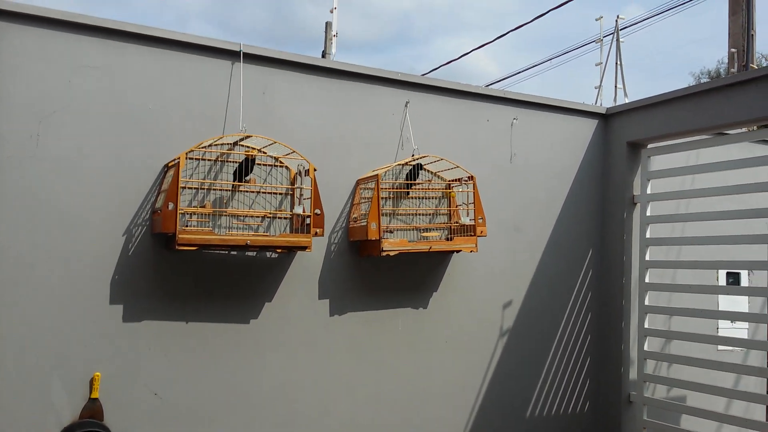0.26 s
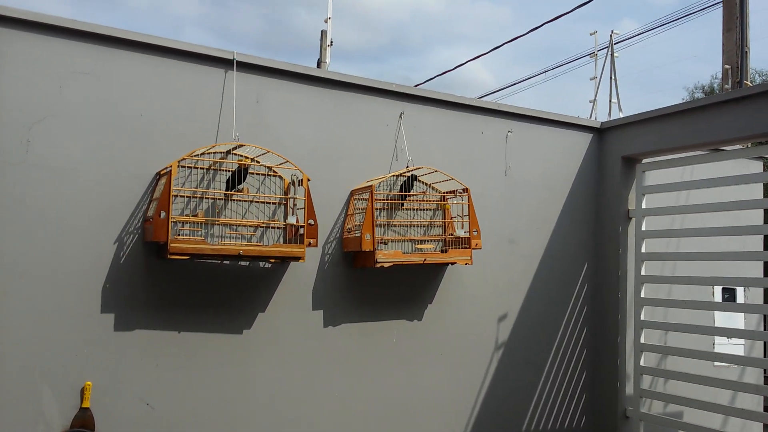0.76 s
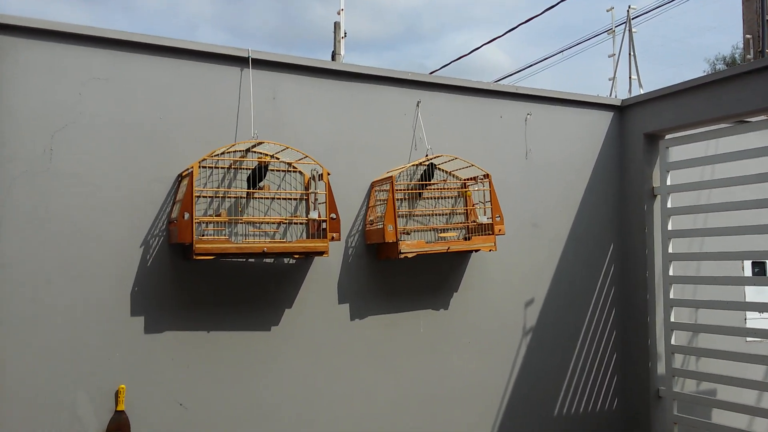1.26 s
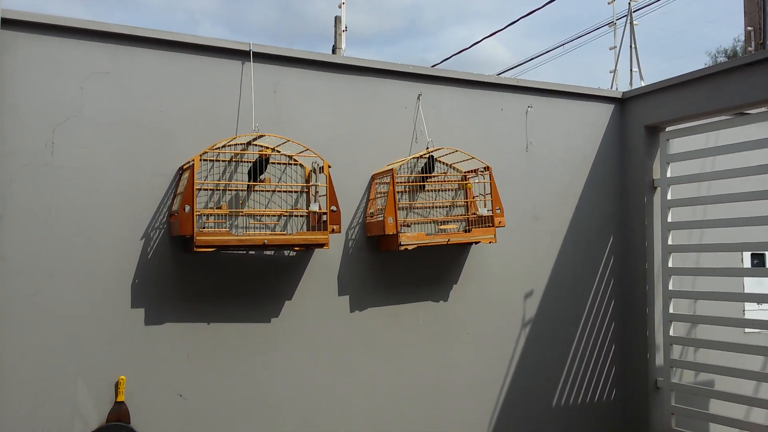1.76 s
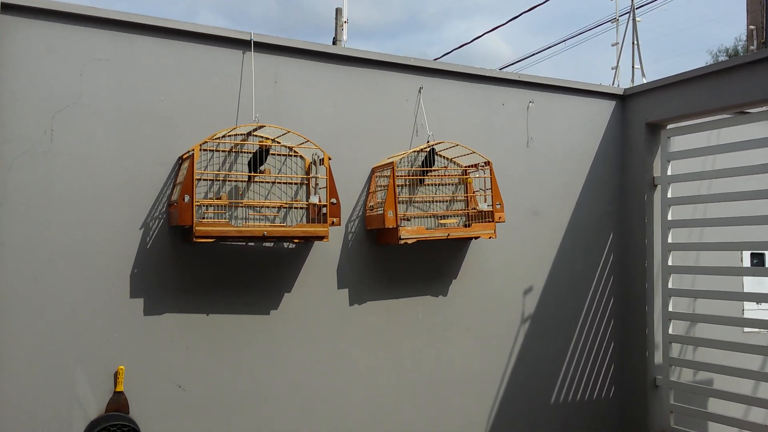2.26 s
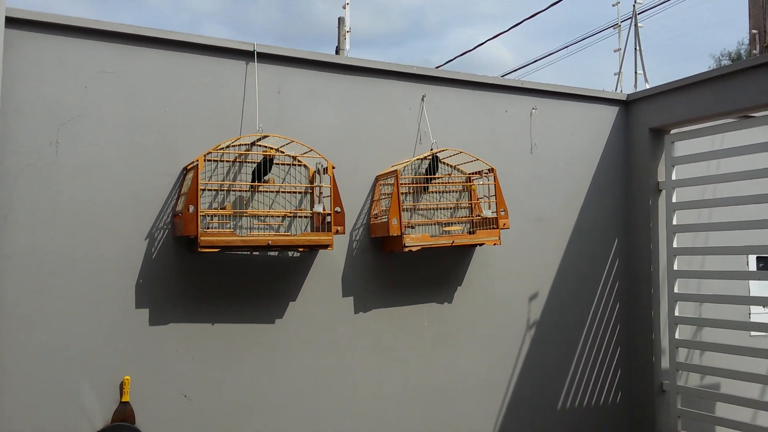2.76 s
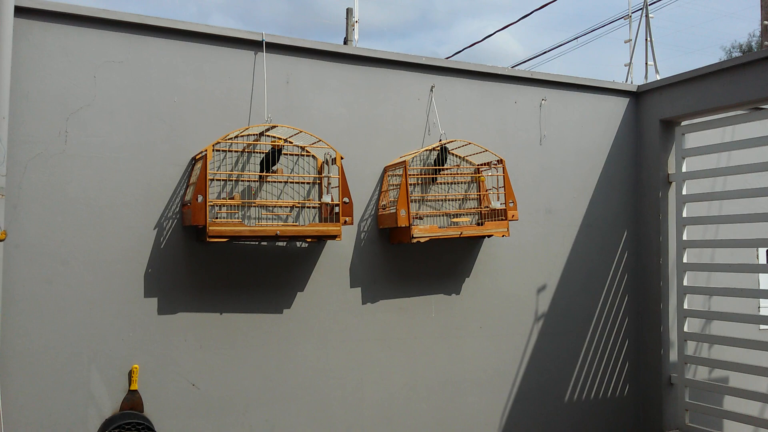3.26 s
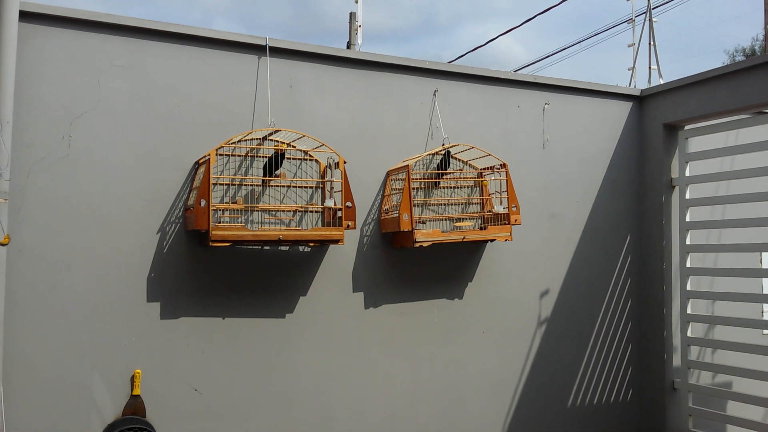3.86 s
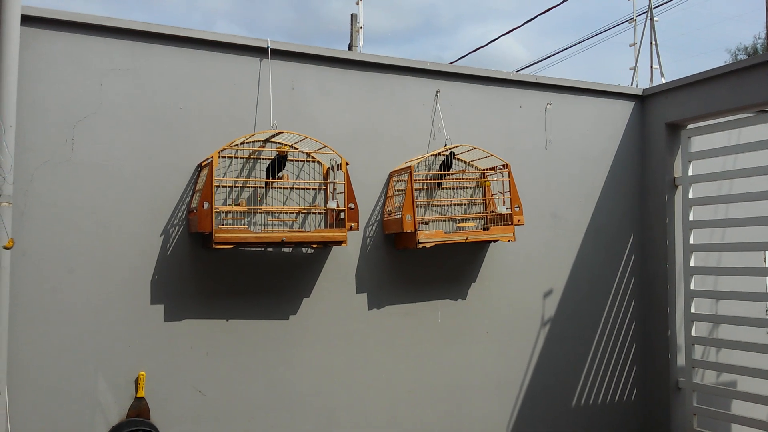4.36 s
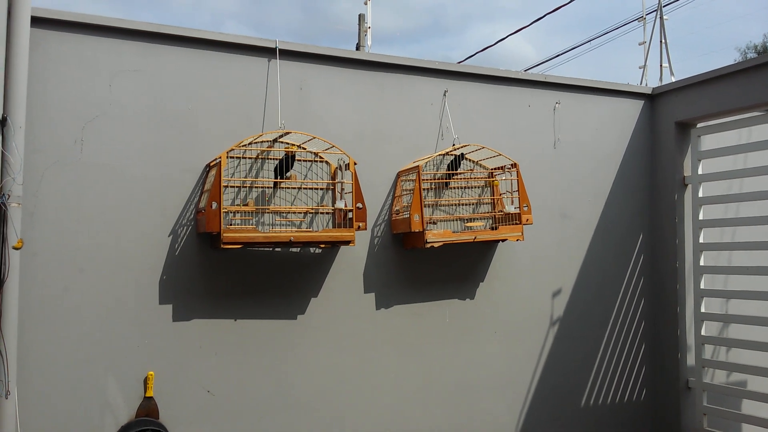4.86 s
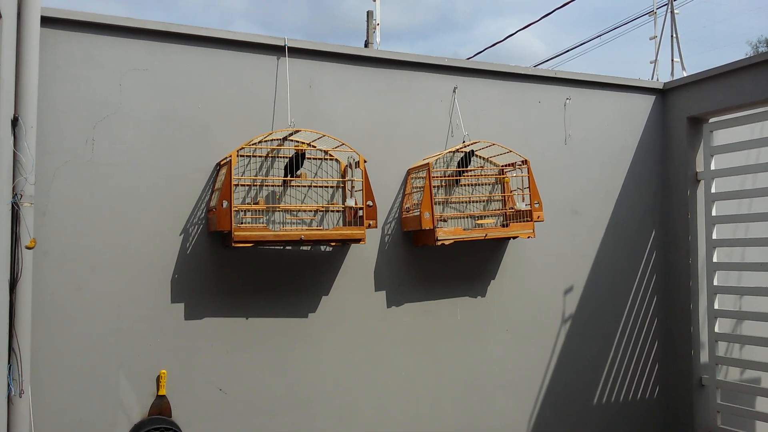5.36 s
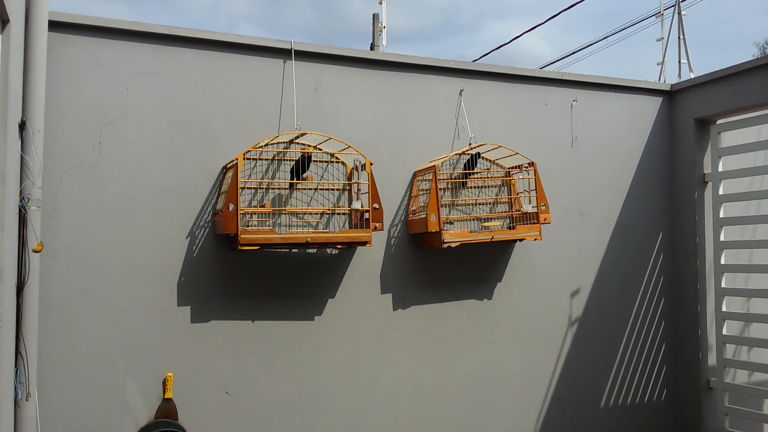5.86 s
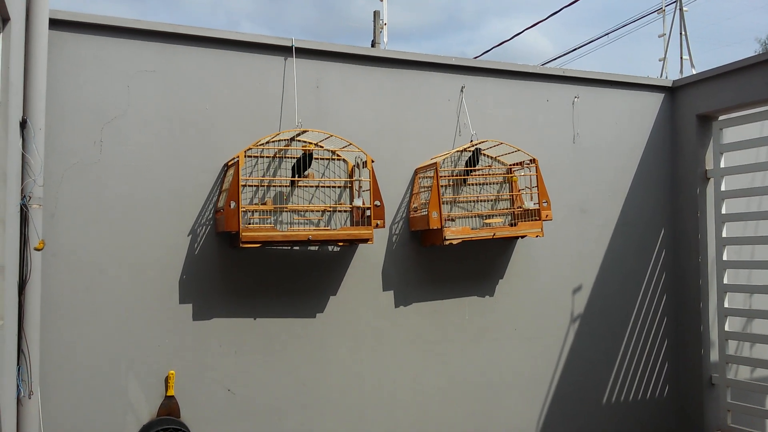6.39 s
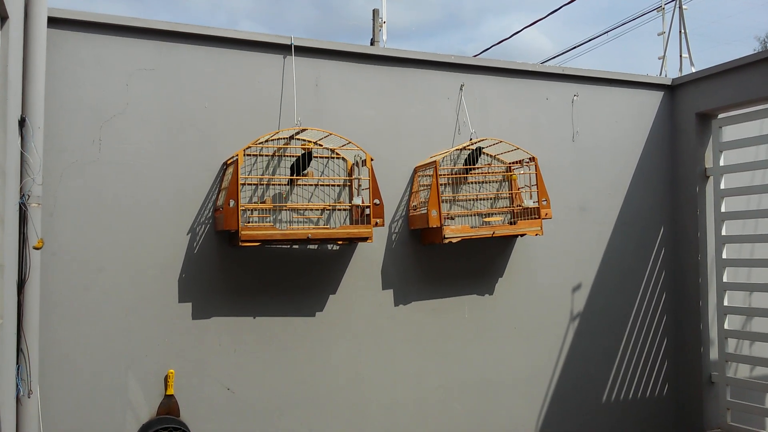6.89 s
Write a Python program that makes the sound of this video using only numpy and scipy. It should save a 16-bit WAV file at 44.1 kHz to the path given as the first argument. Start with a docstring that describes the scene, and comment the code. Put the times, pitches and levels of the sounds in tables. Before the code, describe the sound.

Loud, clear whistles from two caged birds slide up and down with short gaps between them, ringing briefly off the walls of an open yard. Runs of grainy chirps come at the start and the end, with scratchy rasps and quiet reedy notes in between. The birds sound near and direct. A soft thud with a low hum passes early, and a very faint two-note call comes from far off late, over light outdoor rumble and hiss.

```python
"""Caged blackbirds in a courtyard

Two birds sing on the wall of a bare, hard-walled yard. The syrinx membrane gives loud slurred
whistles, soft low notes, held tones and bubbling chirps; vibrating chaotically, it gives short rasps.
The walls smear each glide into a tail. Behind: one far-off call, a dull bump, a low hum, faint rumble."""
import sys
import numpy as np
from scipy import signal
from scipy.fft import rfft, irfft, next_fast_len
from scipy.io import wavfile
from scipy.ndimage import uniform_filter1d, minimum_filter1d

SR = 44100
rng = np.random.default_rng(int(sys.argv[2]) if len(sys.argv) > 2 else 0)


def to_wav(s):
    """Save 16-bit WAV."""
    ch = np.atleast_2d(s).T  # columns
    pcm = np.round(np.clip(ch, -1, 1) * 32767)  # PCM
    wavfile.write(sys.argv[1], SR, pcm.astype(np.int16))


N = 314433
TIME = np.arange(N) / SR

# throat and beak response: f/Hz, gain/dB
BEAK_RESPONSE = [(2000, 4.5), (4500, 0), (5700, 3), (7000, -11), (8800, -6), (10000, -14.5), (11500, -8.5),
                 (13000, 0), (15500, -12.5)]


def whistles(gain_db=-3):
    """Loud slurred notes; two or three tones sound at once where they overlap."""
    # t/s, glide/s, drop/s, f_from/Hz, f_to/Hz, scoop/oct, drop/oct, level/dB, attack/s, fade/dB,
    # pan L-R/dB, octave gain/dB, upper overtone gain/dB, hoarseness/0-1
    notes = [ (0.453, 0.029, 0.0185, 5490, 5466, 0.12, 0.068, -25, 0.0039, 4.5, 6.5, -22, -8, 0.36),
             (0.457, 0.025, 0.049, 3630, 3640, .15, 0.88, -10, 0.0057, -8.5, -3, 0.5, 10.5, 0),
             (.673, 0.072, 0.038, 4056, 4617, -0.06, .33, -1, 0.0033, 10, 2, -7.5, 0.5, 0),
             (1.276, 0.012, 0.005, 5730, 4620, 0.16, 0.06, -16, 0.0077, 6, 5.5, 19, 10, 0.77),
             (1.292, 0.015, 0.052, 3154, 3180, -0.045, 0.65, -9, 0.015, 4, -3, -4.5, 6, 0),
             (1.713, 0.068, 0.046, 2093, 2920, -0.15, 0.025, -17, 0.024, 1, -3, -.5, 7.5, 0.1),
             (2.236, 0.051, 0.14, 2696, 2662, 0.045, .18, -7, 0.06, 3, -4.5, -5.5, 1.5, 0.15),
             (2.693, 0.024, 0.036, 2980, 3163, -.02, 0.52, -9, 0.0093, 1.5, 1.5, -2, 5, 0.28),
             (3.053, 0.021, 0.009, 4450, 4900, -0.18, -0.25, -24.5, 0.00194, 19, 6, -21, -8, .18),
             (3.059, 0.028, 0.0074, 3293, 3630, 0.097, -0.089, -22, 0.0038, 3, 4.5, 13, 7.5, .1),
             (3.076, .12, 0.03, 3630, 3949, 0.051, 0.013, -6, 0.012, -0.5, -0.5, -11, 2.5, 0),
             (3.558, 0.051, 0.12, 3556, 3562, 0.013, -0.11, -5.5, 0.013, 15.5, 0, -3, 4, 0),
             (4.84, .322, 0.044, 2903, 2076, -0.25, .66, -9, .018, 9.5, -3.5, -7, 0.5, 0.03),
             (5.349, 0.0147, 0.0084, 3300, 3417, -0.55, -.04, -16, 0.0096, 5.5, 1.5, 15, -20.5, 0.11),
             (5.349, .038, 0.045, 4780, 5022, -0.086, 1, -0.5, 0.05, 2, 2, -2, 6.5, 0.3),
             (5.79, 0.023, .036, 5910, 5795, -0.81, 1.08, -12, 0.0091, -2.5, 4.5, 5, -22, .02),
             (6.412, .1, .045, 3858, 3756, 0.0083, .15, -14.5, 0.016, -4, 4.5, 2.5, 4, 0),
             (6.416, 0.036, 0.13, 4060, 4104, 0.13, 0.69, -23.5, .02, -1.5, 5, -15, 8, 0.1),
             (6.422, .06, .09, 3480, 3737, -0.03, .24, -10, 0.035, 1, 1.5, 5, 15.5, 0.04),
             (6.787, 0.017, 0.02, 2048, 2078, -0.15, 0.57, -19, 0.0051, 13, -6.5, 21.5, 12, 0.12), ]
    out = np.zeros((2, N))
    for start_s, *shape, pan_db, octave_db, upper_db, hoarse in notes:
        tone = voice(slur(start_s, *shape), octave_db, upper_db, hoarse)
        add(out, start_s, from_db(gain_db) * tone, pan_db)
    return out


def held_tones(gain_db=-3, fade_db=4):
    """Tones under the trills, without scoop or drop."""
    # t/s, length/s, f_from/Hz, f_to/Hz, level/dB, attack/s, pan L-R/dB, octave gain/dB,
    # upper overtone gain/dB, hoarseness/0-1
    notes = [(0, 0.23, 1850, 1851, -29.5, 0.00097, 8, 23.5, 18.5, 0.39),
             (6.858, .27, 2000, 1882, -14, .028, -15.5, -17, -13, 0.15)]
    out = np.zeros((2, N))
    for start_s, length_s, from_hz, to_hz, db, attack_s, pan_db, *timbre in notes:
        contour = slur(start_s, length_s, 0, from_hz, to_hz, 0, 0, db + gain_db, attack_s, fade_db)
        add(out, start_s, voice(contour, *timbre), pan_db)
    return out


def low_notes(gain_db=-3, drop_s=0.022, drop_oct=0.3):
    """Quiet reedy notes that hang briefly, then drop."""
    # t/s, glide/s, f_from/Hz, f_to/Hz, scoop/oct, level/dB, pan L-R/dB, overtone gain/dB
    notes = [(.005, 0.08, 1660, 1348, 0.0071, -24, -4, 14), (1.529, 0.014, 1414, 1373, -0.18, -34, -10, 3),
             (2.021, 0.016, 1320, 1211, 0.028, -28, -3, 12),
             (4.51, 0.084, 1521, 1522, -.4, -25.5, -4.5, -1.5),
             (5.63, .057, 1513, 1436, -0.043, -28.5, -2, 9), (6.565, .032, 1450, 1308, 0, -39.5, -9, 10)]
    out = np.zeros((2, N))
    for start_s, glide_s, from_hz, to_hz, scoop_oct, db, pan_db, bright_db in notes:
        contour = slur(start_s, glide_s, drop_s, from_hz, to_hz, scoop_oct, drop_oct, db + gain_db,
                       attack_s=0.01, fade_db=3)
        tone = voice(contour, octave_db=bright_db + 2, upper_db=bright_db - 2, hoarse=0.085)
        add(out, start_s, tone, pan_db)
    return out


def slur(start_s, glide_s, drop_s, from_hz, to_hz, scoop_oct, drop_oct, db, attack_s, fade_db):
    """Note contour that scoops onto pitch, glides and drops. Rows: t/s, f/Hz, level/dB."""
    onset_db, loss_db_per_oct = 19, 13
    scoop_s = min(0.0065, 0.2 * glide_s)
    along = np.linspace(0, 1, num=200)
    t = along * (glide_s + max(drop_s, 0))
    drop_ramp = np.maximum(t - glide_s, 0) / max(drop_s, 1e-6)
    dropped_oct = drop_oct * uniform_filter1d(drop_ramp, size=21, mode="nearest")
    bend_oct = scoop_oct * np.exp(-t / scoop_s) - dropped_oct
    hz = np.interp(t, [0, glide_s], [from_hz, to_hz]) * 2 ** bend_oct
    attack_left = np.maximum(1 - t / max(attack_s, 1e-6), 0)
    level_db = db - onset_db * attack_left - fade_db * along - loss_db_per_oct * dropped_oct
    return np.transpose([start_s + t, hz, level_db])


def voice(contour, octave_db, upper_db, hoarse, grain_hz=600):
    """Nearly pure tone; hoarseness roughens the overtones and adds period doubling."""
    # harmonics 2-6: level/dB
    harmonics_db = [-17.5, -27, -36, -33.5, -36]
    phase, pitch_hz, level = syrinx(contour)
    t = TIME[:len(phase)]
    # the membrane slackens as pitch falls: less steady, and duller in a quick fall
    fallen_oct = np.log2(np.maximum.accumulate(pitch_hz) / pitch_hz)
    phase = phase + 0.15 * fallen_oct * waver(t, grain_hz)
    slack_gain = from_db(-fallen_oct / t[-1])
    overtones = 0
    for k, db in enumerate(harmonics_db, 2):
        grain_rad = (0.45 + hoarse) * waver(t, grain_hz) / np.sqrt(k)
        gain = from_db(db + (octave_db if k == 2 else upper_db))
        overtones += gain * partial(phase + grain_rad, pitch_hz, k)
    effort = rms_one(uniform_filter1d(level, size=600, mode="nearest"))
    tone = np.sin(phase) + slack_gain * effort ** 0.25 * overtones
    doubling = 1 + 0.065 * hoarse * np.cos(phase / 2)
    return level * tone * doubling


def syrinx(contour, jitter=0.0035, shimmer_db=2.36, edge_s=0.0022, jitter_rate_hz=350):
    """Membrane following a contour, slightly unsteady. Returns phase/rad, f/Hz, amplitude."""
    times_s, hz, db = np.transpose(contour)
    t = np.arange(times_s[0], max(times_s[-1], times_s[0] + edge_s) + edge_s, 1 / SR)
    pitch_hz = uniform_filter1d(np.interp(t, times_s, hz), size=130, mode="nearest")
    pitch_hz *= 1 + jitter * waver(t, jitter_rate_hz)
    to_edge_s = np.minimum(t - t[0], t[-1] - t)
    fade = np.sin(np.pi / 2 * np.clip(to_edge_s / edge_s, 0, 1)) ** 2
    level = from_db(np.interp(t, times_s, db) + shimmer_db * waver(t, 150))
    return 2 * np.pi * np.cumsum(pitch_hz) / SR, pitch_hz, np.sqrt(2) * level * fade


def partial(phase, pitch_hz, multiple):
    """One harmonic as it leaves the beak."""
    hz = multiple * pitch_hz
    return from_db(at_hz(BEAK_RESPONSE, hz)) * (hz < SR / 2) * np.sin(multiple * phase)


def trills(period_s=0.06):
    """Even runs of chirps, sinking and growing rougher. Yields t/s, f/Hz, level/dB, relative jitter."""
    # t_first/s, t_last/s, f_first/Hz, f_last/Hz, level/dB, swell/dB, relative jitter of last chirp
    runs = [(.018, 0.354, 1911, 1691, -16, -1, 0.061), (6.866, 7.047, 1934, 1694, -17.5, 0.5, 0.042)]
    for first_s, last_s, first_hz, last_hz, db, swell_db, jitter in runs:
        span_s = last_s - first_s
        for along in np.linspace(0, 1, round(span_s / period_s) + 1):
            hz = first_hz * (last_hz / first_hz) ** along
            jitter_share = np.interp(along, [0, 1], [0.64, 1])
            yield first_s + along * span_s, hz, db + swell_db * along, jitter * jitter_share


def chirps(hold_s=0.01134, drop_s=0.00999, grain_rad=0.22, grain_hz=900, gain_db=-3):
    """Grainy notes that hang an instant, then drop; strongest on the second partial."""
    # partials 1-7: level/dB
    partials_db = [-11, 3.5, -12, -12, -24, -23.5, -30]
    out = np.zeros((2, N))
    for centre_s, hz, db, jitter in trills():
        start_s, knee_s = centre_s - hold_s / 2, centre_s + hold_s / 2
        contour = [(start_s, hz, db - 5), (knee_s, 0.95 * hz, db), (knee_s + drop_s, 0.74 * hz, db - 13)]
        phase, pitch_hz, level = syrinx(contour, jitter, shimmer_db=3, jitter_rate_hz=grain_hz)
        t = TIME[:len(phase)]
        tone = sum(from_db(part_db) * partial(phase + grain_rad * waver(t, grain_hz), pitch_hz, k)
                   for k, part_db in enumerate(partials_db, 1))
        add(out, start_s, from_db(gain_db) * level * tone, pan_db=-3)
    return out


def rasps(flutter_db=2, flutter_hz=300, rattle_db=5, rattle_hz=75):
    """Chaotic syrinx vibration: fluttering, rattling hiss through throat and beak resonances."""
    # t/s, length/s, f_centre/Hz, level/dB, pan L-R/dB, treble tilt/(dB/oct)
    bursts = [(0.094, 0.29, 3290, -20.5, 1, 1.5), (0.844, 0.026, 2370, -21.5, -5, 3.5),
              (0.972, 0.13, 3355, -20, -0.5, 5), (1.606, 0.1, 1812, -28.5, -4.5, 2.5),
              (2.812, 0.065, 2025, -18.5, -6.5, 2.5), (3.314, 0.059, 1940, -22, -4.5, 3),
              (3.784, 0.064, 2060, -22, -3.5, 6), (4.267, 1, 4600, -50, 4, 6.5),
              (6.54, 0.12, 2910, -20, -2, 5.5)]
    # f/f_centre, level/dB
    rasp_spectrum = [(.25, -50), (.42, -27.5), (.6, -13), (.74, -9), (.9, 1), (1.15, 1.5), (1.45, -16),
                     (2.4, -18.5), (3.4, -30.5), (6.5, -32)]
    # throat resonances: f/Hz, width/Hz, boost/dB
    resonances = [(942, 140, 9), (1230, 61, 12.5), (1893.6, 55, 7.5), (2490, 190, 9.5)]
    out = np.zeros((2, N))
    hz = np.geomspace(300, 16000, num=300)
    throat_db = sum(boost_db * np.exp(-((hz - peak_hz) / width_hz) ** 2)
                    for peak_hz, width_hz, boost_db in resonances)
    tract_db = throat_db + at_hz(BEAK_RESPONSE, hz)
    for start_s, length_s, centre_hz, db, pan_db, tilt in bursts:
        t = np.arange(int(length_s * SR)) / SR
        treble_db = tilt * np.clip(np.log2(hz / centre_hz), 0, 2)
        colour_db = at_hz(rasp_spectrum, hz / centre_hz) + tract_db + treble_db
        hiss = np.resize(coloured(16384, np.transpose([hz, colour_db])), len(t))
        rattle = np.sin(2 * np.pi * rattle_hz * t + 2 * waver(t, rattle_hz))
        flutter = np.tanh(waver(t, flutter_hz))
        rough = rms_one(hiss * from_db(flutter_db * flutter + rattle_db * rattle))
        arch = np.sin(np.pi * t / length_s) ** 0.65
        add(out, start_s, from_db(db) * rough * arch, pan_db)
    return out


def courtyard(sound, direct_gain, tail_db=0.56, build_s=0.008, predelay_s=0.0073):
    """Direct sound, slaps from floor and walls, then a dense tail whose treble dies first."""
    # early echoes: left delay/s, right delay/s, level/dB
    slaps = [(.0031, 0.0033, -2), (.0094, 0.01038, -3), (0.0176, 0.03, -21), (0.031, .027, -9.5)]
    # reverberation: f/Hz, T60/s
    decay_times = [(300, 1), (1200, 0.59), (2500, 0.65), (4000, 0.52), (6000, 0.58), (9000, 0.52),
                   (15000, 0.078)]
    t = np.arange(SR) / SR
    hz = np.fft.rfftfreq(SR, 1 / SR)
    white = rfft(rng.standard_normal((2, SR)))
    centres_hz, t60s_s = np.transpose(decay_times)
    tail = 0
    for weights, t60_s in zip(np.eye(len(centres_hz)), t60s_s):
        band = irfft(white * np.interp(hz, centres_hz, weights), SR)
        tail += band * from_db(-60 * t / t60_s)
    tail *= 1 - np.exp(-np.maximum(t - predelay_s, 0) / build_s)
    response = from_db(tail_db) * tail / np.sqrt(SR * 0.03)
    response[[0, 1], [0, 4]] += direct_gain   # left leads by 4 samples
    for left_s, right_s, db in slaps:
        response[[0, 1], [int(left_s * SR), int(right_s * SR)]] += from_db(db)
    return signal.fftconvolve(sound, response, axes=1)[:, :N]


def far_call():
    """Two faint drawn-out notes from beyond the wall."""
    # t/s, length/s, f_from/Hz, f_to/Hz, level/dB
    notes = [(5.505, 0.44, 546.6, 550, -61), (5.963, .88, 773, 749, -59.5)]
    out = np.zeros((2, N))
    for start_s, length_s, from_hz, to_hz, db in notes:
        contour = slur(start_s, length_s, 0, from_hz, to_hz, 0, 0, db, attack_s=0.03, fade_db=2)
        phase, _, level = syrinx(contour, jitter=0.035, shimmer_db=4, edge_s=0.03, jitter_rate_hz=22)
        add(out, start_s, level * np.sin(phase), pan_db=-1)
    return out


def bump(hz=218, width_s=0.026):
    """Dull, rounded thud: a short swell of an unsteady low tone."""
    # t/s, level/dB
    thuds = [(.635, -31)]
    peak_s, db = thuds[0]
    swell = np.exp(-((TIME - peak_s) / width_s) ** 2)
    return from_db(db) * np.sqrt(2) * swell * np.sin(2 * np.pi * hz * TIME + waver(TIME, 90))


def low_hum(hz=224, waver_hz=28, base_db=-59, swell_db=15, peak_s=0.82, width_s=0.23):
    """Narrow, wavering hum that swells once, just after the bump."""
    phase = 2 * np.pi * hz * TIME
    hum = waver(TIME, waver_hz) * np.cos(phase) + waver(TIME, waver_hz) * np.sin(phase)
    swell = np.exp(-((TIME - peak_s) / width_s) ** 2)
    return from_db(base_db + swell_db * swell) * hum


def outdoor_air(rumble_gain_db=12, hiss_gain_db=-51, split_hz=800, top_hz=13000):
    """Rumble that swells and sinks, alike in both ears, under steady diffuse hiss."""
    # f/Hz, relative density/dB
    air_spectrum = [(18, -45.5), (30, -17.5), (117, -11.5), (379, -16.5), (455, -18), (575, -17.5),
                    (767, -16), (1260, -21), (1870, -6), (2690, -5), (3980, -12.5), (4540, -7.5),
                    (5450, -11), (8280, -30.5), (15500, -22)]
    # t/s, relative level/dB
    rumble_levels = [(0.0, -55.5), (0.61, -50), (0.83, -51.5), (1.19, -63.5), (3.02, -53.5), (3.81, -60.5),
                     (4.81, -52), (5.54, -55), (5.66, -52.5), (7.13, -53)]
    # f/Hz, left-right correlation
    correlation = [(60, .92), (200, 0.887), (500, 0.75), (1200, 0.25), (4000, 0.24), (15000, 0.055)]
    hz = np.fft.rfftfreq(N, 1 / SR)
    alike = at_hz(correlation, hz)
    mid, side = rfft(coloured(N, air_spectrum)), rfft(coloured(N, air_spectrum))
    air = np.sqrt(1 + alike) * mid + np.sqrt(1 - alike) * side * [[1], [-1]]
    lowpass = 1 / (1 + (hz / split_hz) ** 2)
    rumble = irfft(air * lowpass, N)
    hiss = irfft(air * (1 - lowpass) / (1 + (hz / top_hz) ** 2), N)
    rumble_db = rumble_gain_db + np.interp(TIME, *np.transpose(rumble_levels))
    return from_db(rumble_db) * rumble + from_db(hiss_gain_db) * hiss


def from_db(db):
    """Decibels to gain."""
    return 10 ** (np.asarray(db) / 20)


def rms_one(x):
    """Scale to unit power."""
    return x / np.sqrt(np.mean(x ** 2) + 1e-20)


def at_hz(points, hz):
    """Read a table on a log-frequency axis."""
    known_hz, values = np.transpose(points)
    return np.interp(np.log(np.maximum(hz, 1e-3)), np.log(known_hz), values)


def coloured(size, spectrum):
    """Unit-power noise; spectrum rows: f/Hz, level/dB."""
    hz = np.fft.rfftfreq(next_fast_len(2 * size), 1 / SR)
    white = rfft(rng.standard_normal(2 * len(hz) - 2))
    return rms_one(irfft(white * from_db(at_hz(spectrum, hz)))[:size])


def waver(t, rate_hz):
    """Random drift, linear between Gaussian knots."""
    knots = rng.standard_normal(4096)
    return np.interp((t - t[0]) * rate_hz, np.arange(len(knots)), knots)


def add(out, start_s, sound, pan_db):
    """Mix a sound into stereo; positive pan is left."""
    i = max(int(start_s * SR), 0)
    gains = from_db([[pan_db / 2], [-pan_db / 2]])
    out[:, i:i + len(sound)] += rms_one(gains) * sound[:max(N - i, 0)]


def scene():
    """Song carries straight from the cages; rasps and far call arrive more by way of the walls."""
    song = courtyard(whistles() + held_tones() + low_notes() + chirps(), direct_gain=0.86)
    diffuse = courtyard(rasps() + far_call(), direct_gain=0.29)
    return song + diffuse + low_hum() + bump() + outdoor_air()


def record(dry, low_cut_hz=48, ceiling=0.93, high_cut_hz=15800):
    """Microphone bass roll-off, peak limiter, steep treble cut."""
    highpass = signal.butter(4, low_cut_hz, "high", fs=SR, output="sos")
    lowpass = signal.ellip(12, 0.1, 80, high_cut_hz, fs=SR, output="sos")
    mic = signal.sosfilt(highpass, dry)
    allowed_gain = np.minimum(1, ceiling / (np.abs(mic).max(axis=0) + 1e-9))
    gain = uniform_filter1d(minimum_filter1d(allowed_gain, size=600), size=600)
    return signal.sosfilt(lowpass, mic * gain)


dry = scene()
out = record(dry)
to_wav(out)
```